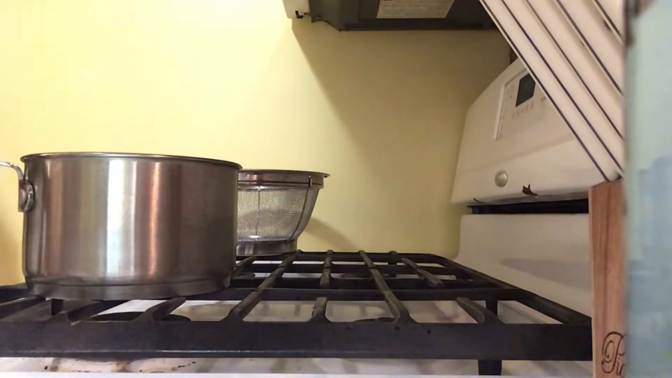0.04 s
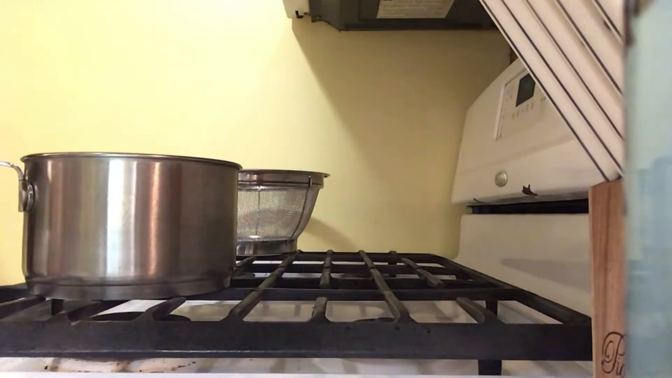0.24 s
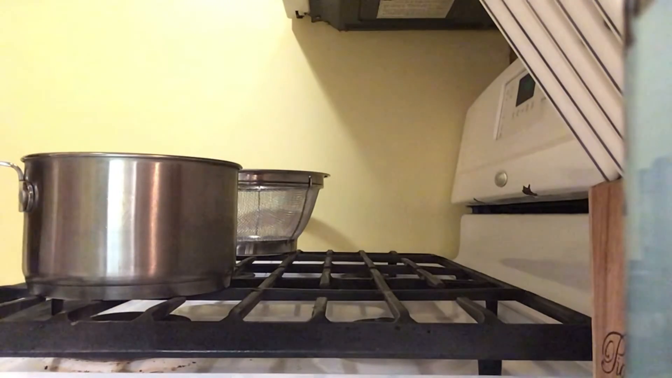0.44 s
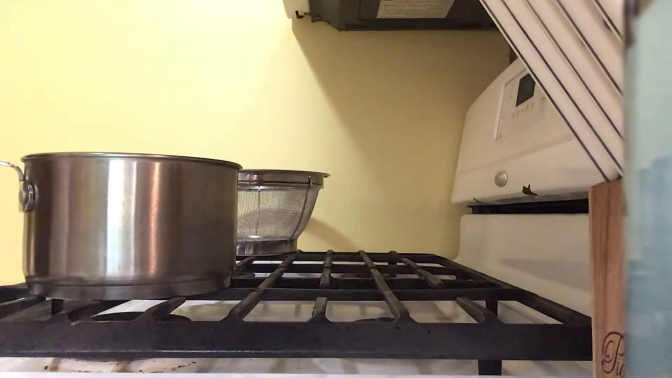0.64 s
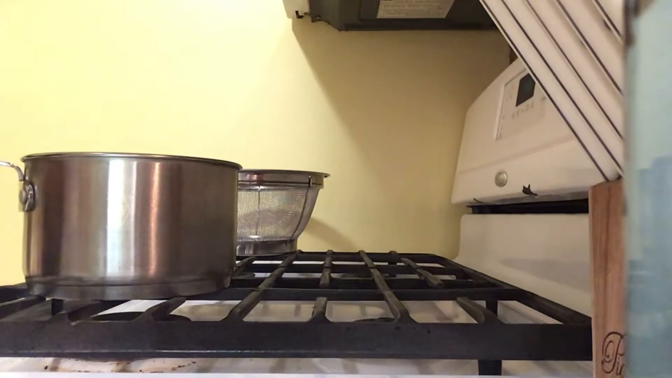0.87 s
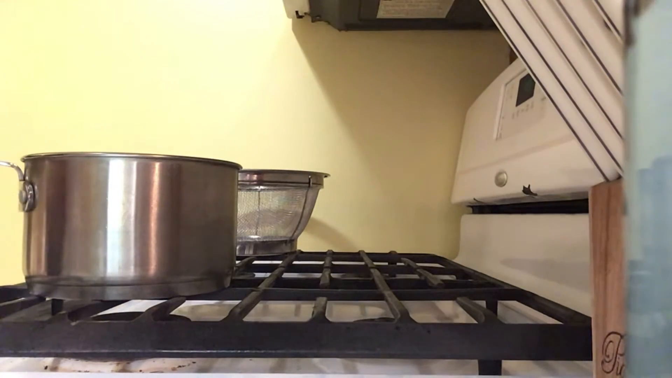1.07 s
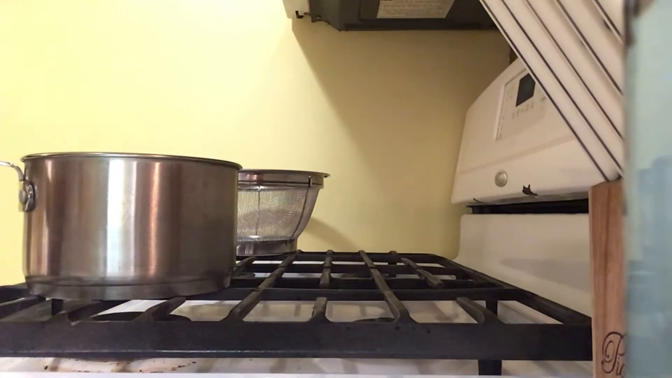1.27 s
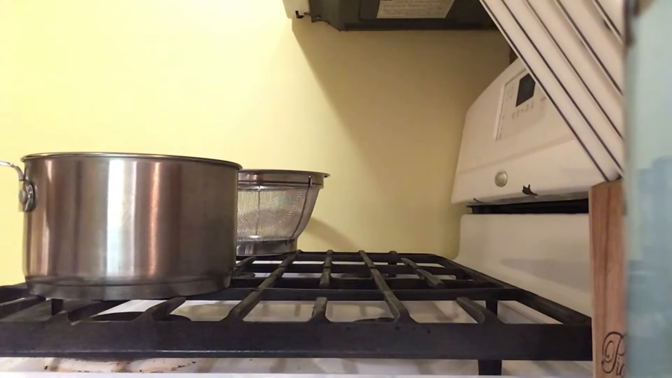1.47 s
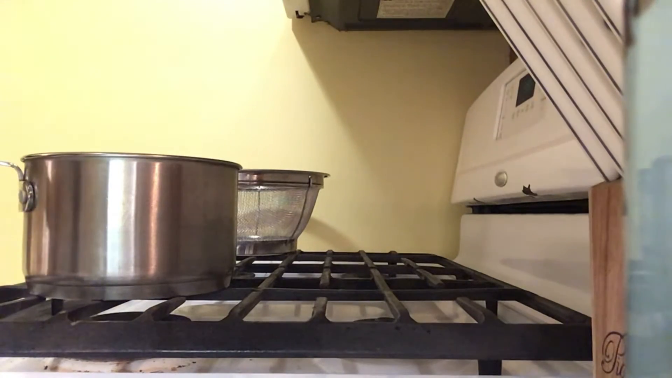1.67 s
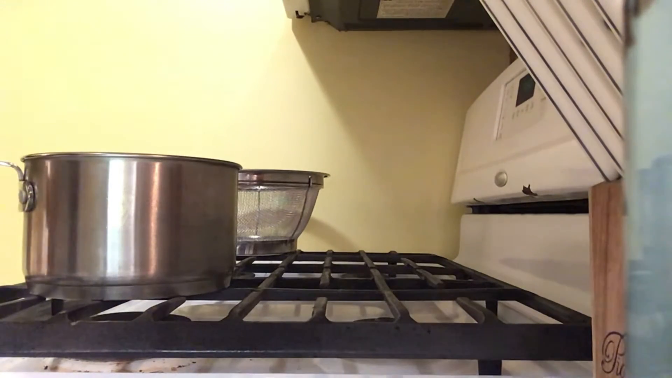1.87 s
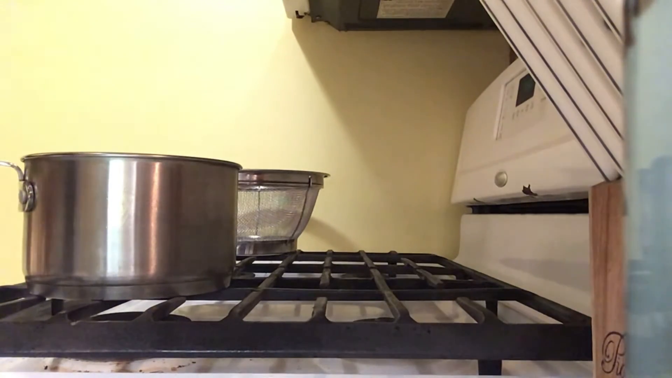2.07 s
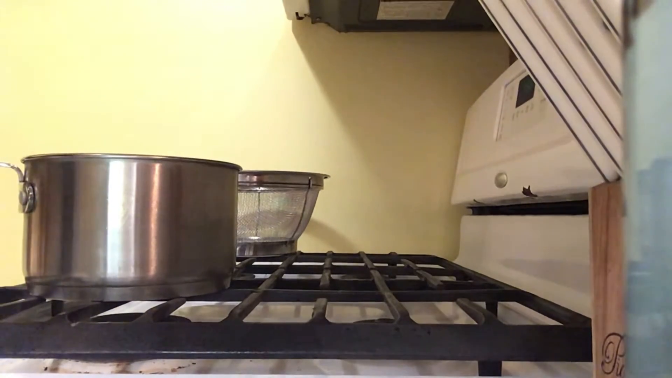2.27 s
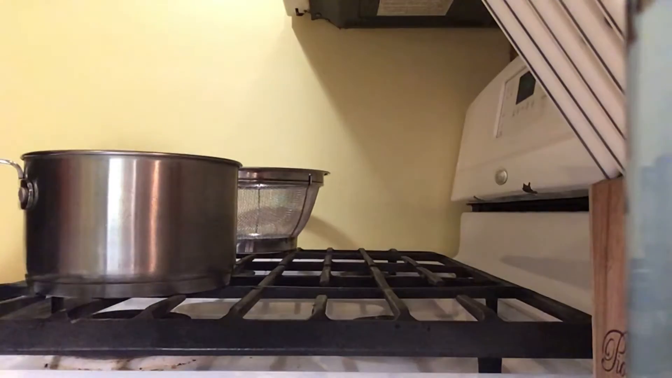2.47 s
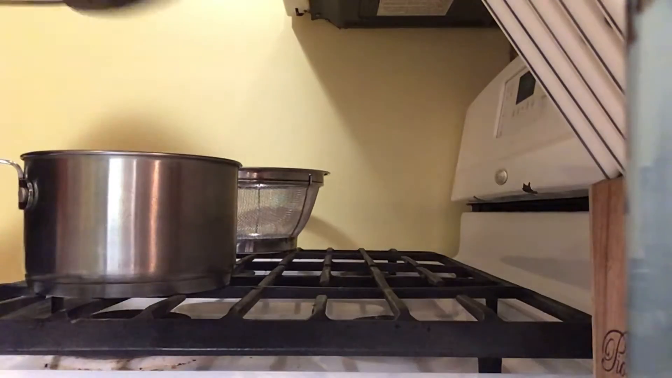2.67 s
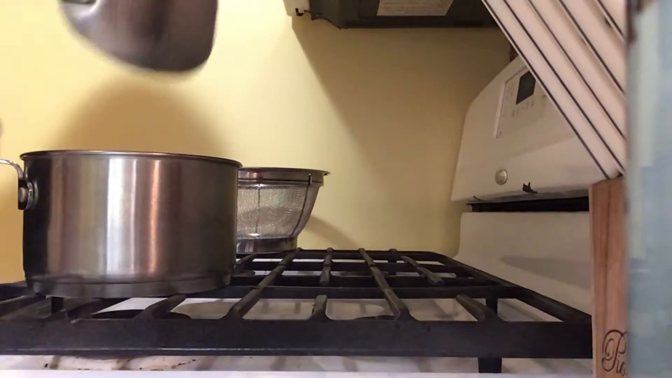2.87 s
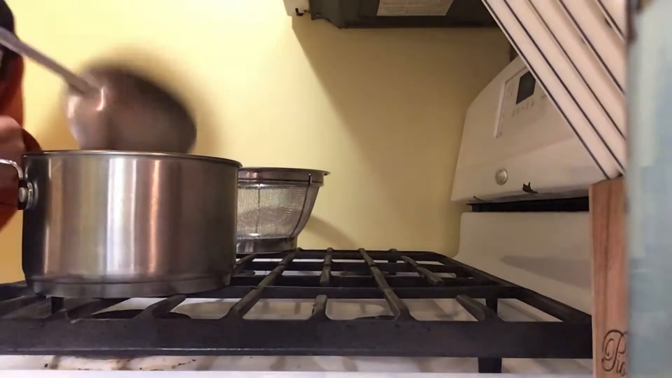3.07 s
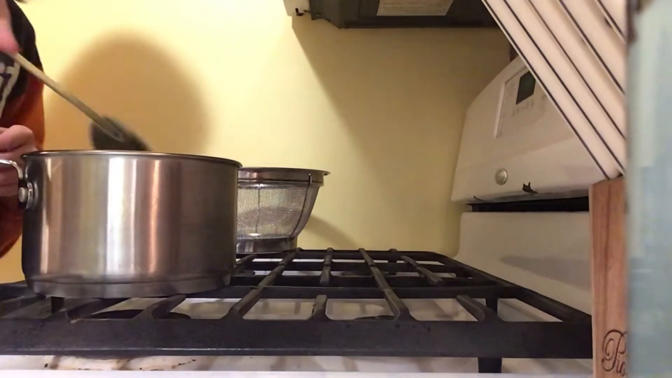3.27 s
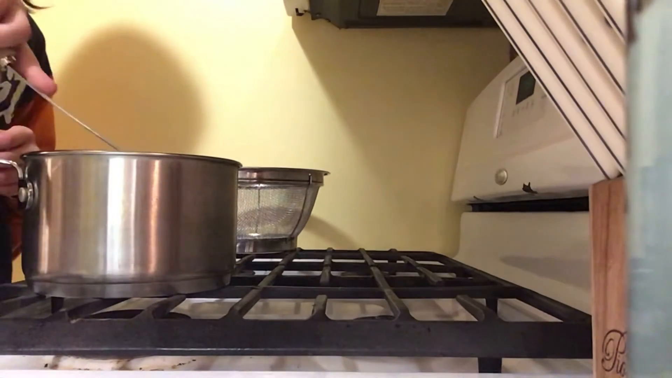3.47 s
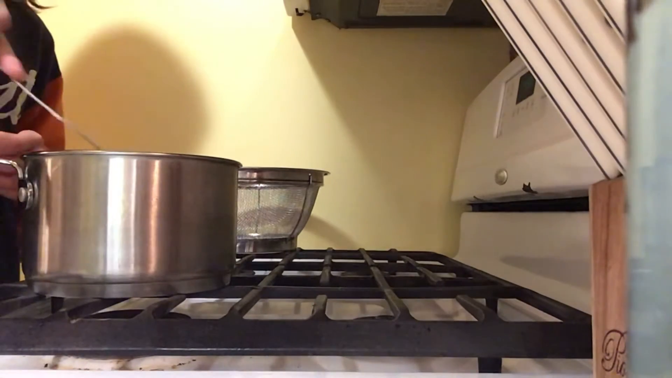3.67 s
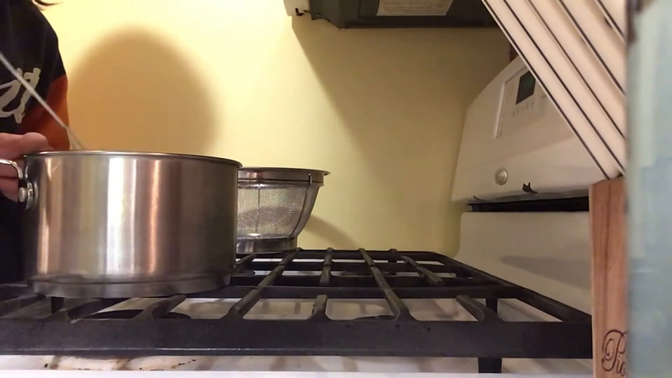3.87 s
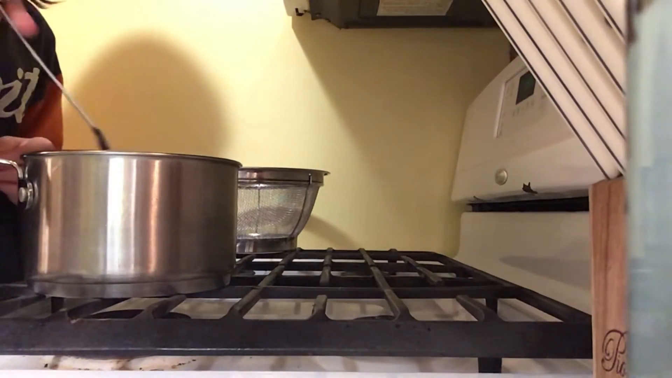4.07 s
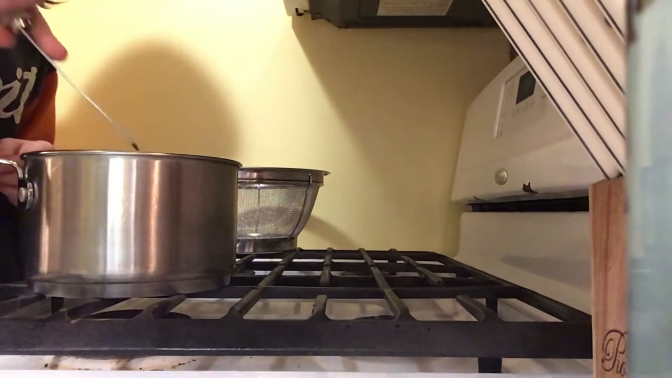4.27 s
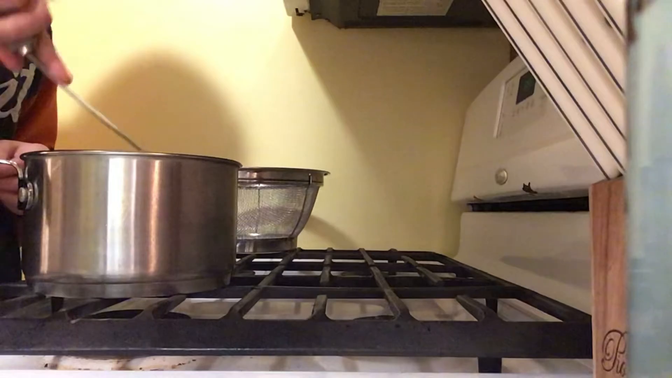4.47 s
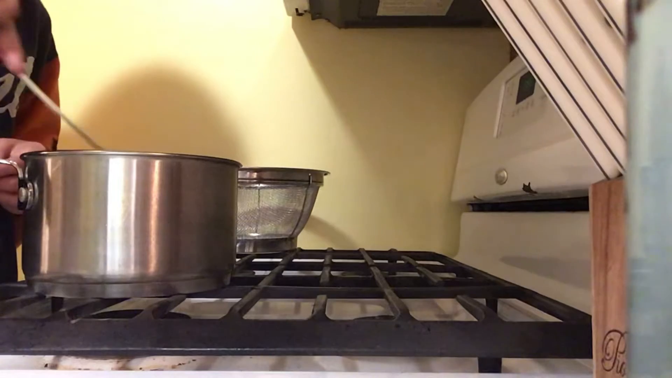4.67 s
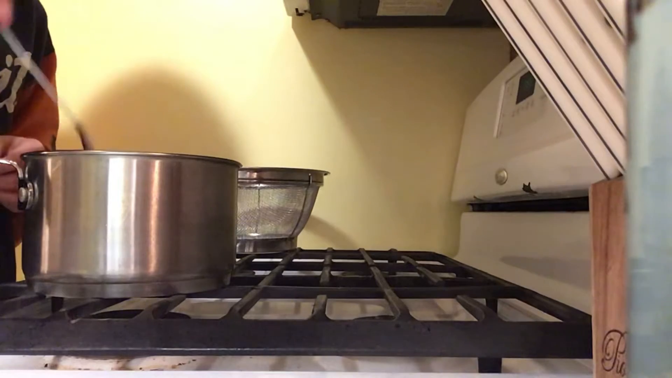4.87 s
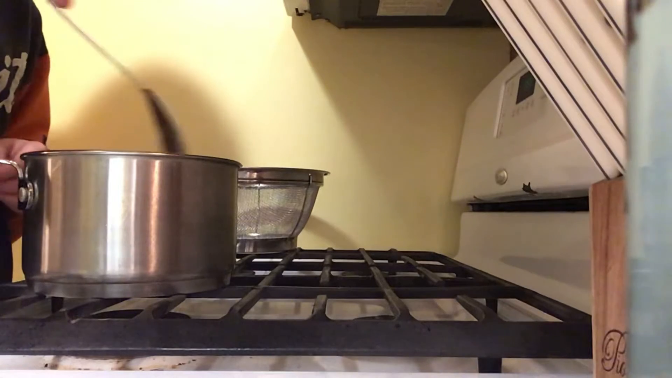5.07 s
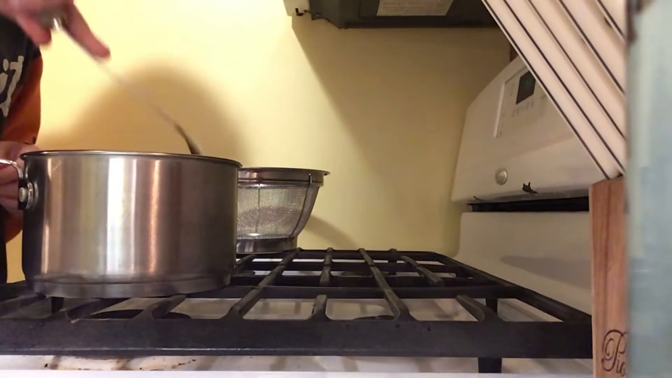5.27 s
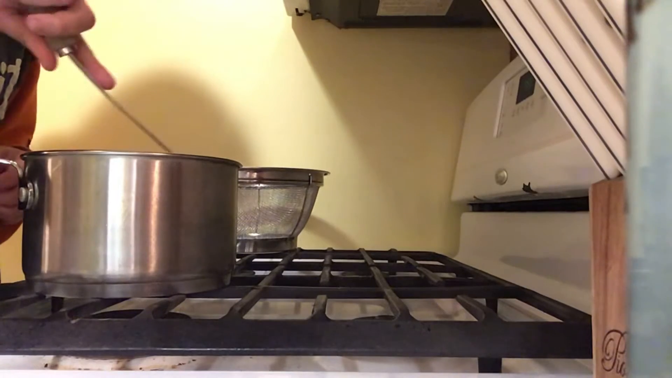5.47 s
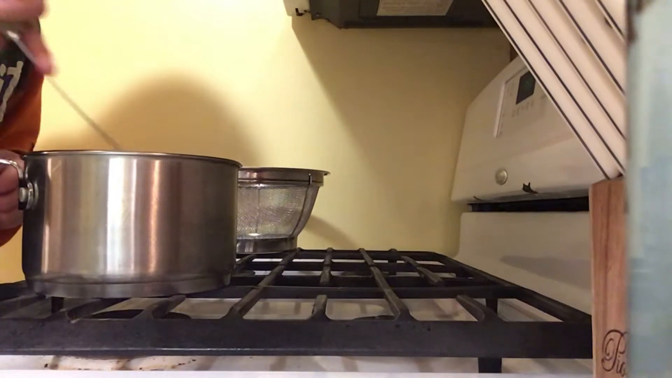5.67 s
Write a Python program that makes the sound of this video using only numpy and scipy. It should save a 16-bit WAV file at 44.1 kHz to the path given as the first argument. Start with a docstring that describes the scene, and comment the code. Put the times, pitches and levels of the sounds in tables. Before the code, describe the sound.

In a small, quiet kitchen with a low hum, cloth rustles faintly, then steel utensils clash in a quick bright jangle as a spoon is pulled out. After a near-silent pause with tiny rings, the spoon knocks a large pot, food crackles softly, and clanks and short scrapes follow. Close microphone, short hard-room echo.

```python
"""Small kitchen, low rumble and hum: a steel serving spoon is fetched, then stirs food in a pot on a stove.
Cloth rustles as noise grains; utensils clash, taps ring the bowl, and the spoon knocks the food-damped pot:
each contact is a noise burst plus ringing modes. Low thuds of counter, stove and grate are resonant noise.
Scraping runs random slips through gliding resonances, over grit and hiss; food crackles in tiny grains.
The kitchen answers every contact with near echoes and a diffuse tail."""
import sys
import numpy as np
from scipy import signal
from scipy.fft import rfft, irfft, next_fast_len
from scipy.io import wavfile
from scipy.ndimage import map_coordinates

SR = 44100
rng = np.random.default_rng(int(sys.argv[2]) if len(sys.argv) > 2 else 0)


def transcribe(signal):
    """Save signal, clipped to [-1, 1], as a 16-bit WAV file at the path in sys.argv[1]."""
    frames = np.atleast_2d(signal).T
    limited = np.clip(frames, -1, 1)
    pcm = np.round(limited * 32767).astype(np.int16)
    wavfile.write(sys.argv[1], SR, pcm)


N = 253027

# room reverberation: freq_hz, t60_s
KITCHEN_DECAY = [(120, 0.74), (400, 0.47), (1500, 0.46), (4000, 0.34), (8000, 0.35), (15000, .27)]
# room rumble spectrum: freq_hz, density_db_per_hz
RUMBLE_SPECTRUM = [(25, -61), (40, -18), (50, -14.5), (65, -1.5), (90, -6), (120, -3.5), (150, -7.5),
                   (270, -8), (400, -15), (750, -26), (1500, -31.5), (4000, -33), (13000, -41),
                   (16000, -55)]
# arm movements: peak_s, relative_level_db, half_length_s
ARM_MOVES = [(0.27, -78, 0.041), (0.61, -65, 0.13), (1.35, -68.5, 0.52), (2.14, -65.5, 0.061),
             (2.75, -78.5, 0.22), (3.42, -72, 0.19)]
# cloth spectrum: freq_hz, density_db_per_hz
CLOTH_SPECTRUM = [(500, -27.5), (1000, -6.5), (1600, 1), (4000, -7), (9000, -8.5), (14000, -7),
                  (16000, -14.5)]
# utensils clashing; hardness is treble over midrange, spot is the favoured pitch; levels are relative:
# start_s, strength_db, hardness_db, spot_hz, ring_db, rebound_db
CLASHES = [(0.86, -29, -3.5, 3560, -9.5, -17.5), (0.996, -40, -10.5, 5915, 4, -13),
           (1.165, -46, -11, 3900, 5, -5.5), (1.186, -42, -3.5, 7890, -8, -12),
           (1.191, -22.5, 6.5, 12840, 1.5, -0.5), (1.211, -33, 9.5, 11600, 8, -12.5),
           (1.234, -30.5, -13, 3580, -14, -9.5), (1.283, -27.5, -14, 3710, -4.5, -14),
           (1.305, -40.5, -3.5, 3620, -1.5, -11.5), (1.335, -35, -5.5, 3880, -4, -1),
           (1.344, -21, 2, 2730, -5, 2), (1.387, -30.5, -9, 630, 4.5, -9), (1.402, -23.5, -3, 2960, -2, 7),
           (1.416, -24, -22, 2780, -0.5, -10.5), (1.429, -28, 9, 2100, 5, -5),
           (1.448, -29.5, -3, 2140, -6.5, -11.5), (1.466, -23.5, -4.5, 2310, -8, -3.5),
           (1.483, -29, -5.5, 2250, -15.5, -11.5)]
# utensil modes: freq_hz, level_db, t60_s
UTENSIL_MODES = [(550, -7, 0.13), (582.7, -3, 0.16), (991, -16, 0.32), (1270, -12, 0.38), (2100, 4, 0.2),
                 (2177, 1, .16), (2322, 0.5, 0.092), (2776, -5.5, 0.43), (2670, -1.5, .2), (2855, -4, 0.18),
                 (3717, 1.5, 0.23), (3520, -13.5, 0.2), (4360, -4.5, 0.23), (4860, -2.5, 0.19),
                 (5625, -4.5, 0.35), (5630, -4.5, .22), (6900, -4, 0.32), (8100, 5, .18), (8800, -6, 0.25),
                 (10700, -6.5, 0.17), (10960, -6, 0.14), (11700, -0.5, 0.093), (12200, -5, 0.1),
                 (13800, -7.5, .13)]
# utensils' dense, short-lived modes: freq_hz, density_db_per_hz
UTENSIL_SPECTRUM = [(100, -18), (330, -14), (450, -7.5), (570, -3.5), (700, -19.5), (1600, -3.5),
                    (2200, -0.5), (2900, 7), (3300, -0.5), (3750, 8.5), (4600, -2.5), (7500, 4), (12500, 0),
                    (16000, -1.5)]
# low thuds of counter, stove and grate: start_s, relative_level_db, strongest_resonance_hz
LOW_THUDS = [(1.194, -50, 70.5), (2.04, -61, 410), (4.027, -39, 196), (4.512, -43, 196),
             (4.949, -36.5, 321), (5.105, -38.5, 502), (5.332, -53, 496), (5.406, -44, 193),
             (5.460, -34.5, 157.3), (5.5, -43.5, 140), (5.551, -47, 66)]
# thud spectrum: freq_hz, density_db_per_hz
THUD_SPECTRUM = [(35, -51), (65, -7), (90, -12.5), (160, 0), (200, -6), (250, -19), (330, -6), (500, -7.5),
                 (900, -41.5), (3000, -83.5)]
# light taps on the lifted spoon: start_s, strength_db, hardness_db, spot_hz, ring_db, rebound_db
SPOON_TAPS = [(2.107, -53, -0.5, 4160, -11.5, -12), (2.511, -45, 12, 4215, -3.5, -13),
              (2.715, -64, 6.5, 6600, -7, -0.5), (2.812, -68, -4.5, 4215, -11, -14)]
# spoon bowl modes: freq_hz, level_db, t60_s
BOWL_MODES = [(4280, 0.5, 0.28), (5260, 1, 0.2), (5960, -9, 0.15), (6930, 7, 0.11), (7710, 0, 0.087),
              (8750, -3, 0.12), (11540, -6, 0.16), (12500, 0, 0.2), (12830, -1, 0.14), (14050, 1.5, 0.23)]
# bowl's dense, short-lived modes: freq_hz, density_db_per_hz
BOWL_SPECTRUM = [(300, -33.5), (2000, -8), (4000, 9.5), (5000, -13.5), (7000, 1.5), (13000, -0.5),
                 (16000, -4.5)]
# spoon dragged through the pot; hiss and singing are relative to grinding:
# start_s, length_s, grind_db, hiss_db, sing_db, start_shift_hz
DRAG_STROKES = [(3.311, 0.12, -59, -26, -12, 0), (4.433, 0.175, -45, -7.5, 8, 90.5),
                (4.574, 0.11, -40.5, -7.5, 3, 71), (5.163, 0.1, -53.5, 1.5, -19, 60),
                (5.403, 0.15, -42.5, -17, -3.5, -3), (5.524, 0.22, -38.5, -1.5, 2.5, 162)]
# resonances of the spoon pressed on steel: freq_hz, width_hz, level_db
PRESSED_MODES = [(1260, 28, 7.5), (1614, 46, -3), (1770, 33, 3.5), (2500, 47, -6.5), (3030, 30, -19),
                 (3560, 21, -0.5), (4500, 48, -8), (5670, 50, -10), (6420, 50, -5)]
# grinding spectrum: freq_hz, density_db_per_hz
GRIT_SPECTRUM = [(100, -26.5), (300, 4), (700, 14), (1700, 16.5), (3500, 14), (5000, 6), (8000, -42.5)]
# hiss and food crackle spectrum: freq_hz, density_db_per_hz
HISS_SPECTRUM = [(2500, -28.5), (5500, 0.5), (9000, -0.5), (13000, -4), (16000, -10.5)]
# spoon against the pot: start_s, strength_db, hardness_db, spot_hz, ring_db, rebound_db
POT_KNOCKS = [(3.448, -26, -6.5, 3350, -5, -13), (4.024, -26.5, -1.5, 526, 1.5, 0.5),
              (4.337, -37.5, -18, 3280, 1, -0.5), (4.502, -29, 2.5, 4220, 6, 0),
              (4.943, -31.5, 0.5, 4460, -0.5, 1.5), (5.099, -39, -4, 2880, 6.5, -7.5),
              (5.329, -60, 6.5, 3294, 12.5, 5), (5.395, -42.5, -1, 740, 9, -3),
              (5.454, -36, -8, 2886, 1, 0)]
# pot modes: freq_hz, level_db, t60_s
POT_MODES = [(170.2, -11.5, 0.46), (201, -6.5, 0.19), (323, 1.5, 0.2), (365.4, -5.5, 0.48),
             (498, -4.5, 0.33), (558, -5, 0.15), (694, 13.5, 0.029), (921.5, 2, 0.35), (1314, -7, 0.24),
             (1423, -1.5, 0.28), (1537, -5, 0.25), (1814, -4, 0.32), (2453, 3, 0.09), (2930, 0, 0.1),
             (3340, -4.5, 0.18), (3900, -13.5, .2), (3810, -35.5, 0.18), (4475, -12.5, 0.05),
             (5600, -9.5, 0.11), (6310, 2, 0.11)]
# pot's dense, short-lived modes: freq_hz, density_db_per_hz
POT_SPECTRUM = [(60, -47), (130, -17), (190, 1), (330, -0.5), (430, -3.5), (700, 2), (850, -8), (1400, -6),
                (2100, -11), (3400, -7.5), (5000, -16.5), (8000, -15), (12500, -18), (16000, -29.5)]
# food shifting around the spoon: peak_s, relative_level_db, half_length_s
FOOD_SHIFTS = [(3.54, -69.5, 0.2), (3.797, -68.5, 0.015), (4.25, -75, 0.47), (5.3, -73, 0.42)]

MIC_TOP_HZ = 15950
MAINS_HUM_HZ, RUMBLE_DB = 120, -61.5
PRESS_S, LIFT_T60_S = 0.021, 0.079  # a stroke takes hold; force decays once the spoon lifts
EASE_DB_PER_S, DULL_DB_PER_S = 37, 34.5  # pressure easing along a stroke; extra fading of the hiss
SING_DB, SETTLE_S = -3, 0.13  # pressed steel level; time to reach full singing
SINK_HZ_PER_S = 1200  # resonances sink as the contact point slides


def amp(db):
    """Decibels to gain."""
    return 10 ** (np.asarray(db) / 20)


def unit(x):
    """Scale to rms 1."""
    return x / np.sqrt(np.mean(x ** 2) + 1e-20)


def pulse(x):
    """Scale to energy 1."""
    return x / (np.linalg.norm(x) + 1e-12)


def along(points, hz):
    """Read (Hz, value) points on a log-frequency axis."""
    point_hz, value = np.transpose(points)
    return np.interp(np.log(hz + 1), np.log(point_hz), value)


def fade(t_s, t60_s):
    """Exponential decay, 60 dB per t60."""
    return np.exp(-np.log(1000) * t_s / np.maximum(t60_s, 1e-3))


def add(track, start_s, sound):
    """Mix a sound into the track."""
    part = track[round(start_s * SR):][:len(sound)]
    part += sound[:len(part)]


def filtered(x, response):
    """Multiply the spectrum by a response of frequency."""
    size = next_fast_len(len(x) + SR // 8)
    spectrum = rfft(x, size) * response(np.fft.rfftfreq(size, 1 / SR))
    return irfft(spectrum, size)[:len(x)]


def coloured(x, spectrum):
    """Causal (minimum-phase) filter with the given (Hz, dB) shape."""
    size = 4096
    log_gain = np.log(amp(along(spectrum, np.fft.rfftfreq(size, 1 / SR))))
    cepstrum = irfft(log_gain)
    # fold the cepstrum so the response is causal
    cepstrum[1:size // 2] *= 2
    cepstrum[size // 2 + 1:] = 0
    impulse = irfft(np.exp(rfft(cepstrum)))
    return signal.fftconvolve(x, impulse)[:len(x)]


def resonance(f, hz, width_hz):
    """Response of one damped mode, 1 at its centre."""
    return 1j * f * width_hz / (hz * hz - f * f + 1j * f * width_hz)


def grains(per_second, spread_db):
    """Random tiny impulses of uneven size."""
    hits = rng.random(N) < per_second / SR
    return hits * rng.standard_normal(N) * amp(spread_db * rng.standard_normal(N))


def wobble(knots_per_s):
    """Random curve, linear between knots."""
    knots = rng.standard_normal(SR // 16)
    return map_coordinates(knots, [np.arange(N) * knots_per_s / SR], order=1, mode="wrap")


def swells(rows):
    """Gain per sample: each movement swells and dies as a bell curve."""
    t_s = np.arange(N) / SR
    return sum(amp(db) * np.exp(-((t_s - peak_s) / half_s) ** 2) for peak_s, db, half_s in rows)


def drifting(x, glide, waver):
    """Raise pitch by the share glide, with a random waver."""
    return map_coordinates(x, [np.cumsum(1 + glide + waver * wobble(20))], order=3, mode="wrap")


def kitchen(x, wet_db, near_db=-9, near_t60_s=0.041):
    """Direct sound, quick echoes off the stove, and a diffuse tail with frequency-dependent decay."""
    hz, t_s, cells = signal.stft(rng.standard_normal(SR // 2), SR, nperseg=256)
    decay = fade(t_s, along(KITCHEN_DECAY, hz)[:, None])
    tail = signal.istft(cells * decay, SR, nperseg=256)[1]
    near = rng.standard_normal(len(tail)) * fade(np.arange(len(tail)) / SR, near_t60_s)
    answer = amp(wet_db) * pulse(tail) + amp(near_db) * pulse(near)
    answer = np.pad(answer, (SR // 300, 0))  # nearest surface half a metre away
    return x + signal.fftconvolve(x, answer)[:len(x)]


def contacts(events, knock_db, chatter_t60_s, lag_s, softer_db, deeper_db, rebound_t60_s):
    """Strike and rebound per event; the rebound's treble and bass are offset from its midrange."""
    rows = []
    for start_s, db, hard_db, spot_hz, ring_db, rebound_db in events:
        again_db = db + rebound_db
        rows.append((start_s, db + knock_db, db, db + hard_db, chatter_t60_s, spot_hz, ring_db))
        again_low_db = again_db + knock_db + deeper_db
        again_high_db = again_db + hard_db - softer_db
        rows.append((start_s + lag_s, again_low_db, again_db, again_high_db,
                     rebound_t60_s, spot_hz, ring_db))
    return rows


def strikes(events, modes, body, ring_db, spot_db, detune, wet_db,
            low_db, mid_db, high_db, spot_width, favour_db):
    """Each contact chatters briefly and rings the modes; three registers set its hardness."""
    track, t_s = np.zeros(N), np.arange(SR // 2) / SR
    hz, mode_db, t60_s = np.transpose(modes)[:, :, None]
    bands = [(1200, "low"), ([1200, 5000], "band"), (5000, "high")]
    registers = [signal.butter(3, edge_hz, kind, fs=SR, output="sos") for edge_hz, kind in bands]
    onset = 1 - np.exp(-t_s / .0004)
    for start_s, knock_db, clang_db, sparkle_db, chatter_t60_s, spot_hz, own_ring_db in events:
        width_hz = spot_width * spot_hz
        burst = rng.standard_normal(len(t_s)) * onset * fade(t_s, chatter_t60_s)
        crack = pulse(coloured(burst, body))
        # struck spot favours nearby modes
        sizes = amp(mode_db + 2.5 * rng.standard_normal(hz.shape))
        sizes = sizes * (1 + amp(favour_db) * np.abs(resonance(hz, spot_hz, width_hz)) ** 2)
        # uneven shape splits each mode into a beating pair
        beats = np.cos(2 * np.pi * detune * hz * rng.standard_normal(hz.shape) * t_s)
        # grip and load shift modes from blow to blow
        pitch_hz = hz * (1 + .004 * rng.standard_normal(hz.shape))
        tones = np.sin(2 * np.pi * (pitch_hz * t_s + rng.random(hz.shape)))
        ring = pulse(onset * np.sum(sizes * beats * fade(t_s, t60_s) * tones, axis=0))
        blow = crack + amp(ring_db + own_ring_db) * ring
        # spot colours the whole blow
        blow = filtered(blow, lambda f: 1 + amp(spot_db) * resonance(f, spot_hz, width_hz))
        levels_db = knock_db + low_db, clang_db + mid_db, sparkle_db + high_db
        blow = sum(amp(db) * pulse(signal.sosfilt(sos, blow)) for db, sos in zip(levels_db, registers))
        add(track, start_s, kitchen(blow, wet_db))
    return track


def room_tone(hum_db):
    """Low rumble as shaped noise; appliance mains hum as a sine."""
    hum = amp(hum_db) * unit(np.sin(2 * np.pi * MAINS_HUM_HZ * np.arange(N) / SR))
    rumble = amp(RUMBLE_DB) * unit(coloured(rng.standard_normal(N), RUMBLE_SPECTRUM))
    return hum + rumble


def sleeve():
    """Moving cloth rustles in dense, uneven grains."""
    return swells(ARM_MOVES) * unit(coloured(grains(per_second=9000, spread_db=6.5), CLOTH_SPECTRUM))


def clatter():
    """Utensils clash and rebound as the spoon is pulled from among them."""
    blows = contacts(CLASHES, knock_db=-17.5, chatter_t60_s=0.035, lag_s=0.005,
                     softer_db=1, deeper_db=-1.5, rebound_t60_s=0.035)
    return strikes(blows, UTENSIL_MODES, UTENSIL_SPECTRUM, ring_db=-4.5, spot_db=8.5, detune=.004,
                   wet_db=-8.0, low_db=30, mid_db=22.0, high_db=23.0, spot_width=0.05, favour_db=4)


def thuds(thud_db, t60_s, wet_db, boom_db=9, boom_width=0.093):
    """Low thuds of counter, stove and grate: short noise with one boosted resonance."""
    track, t_s = np.zeros(N), np.arange(SR // 2) / SR
    for start_s, db, boom_hz in LOW_THUDS:
        thud = coloured(rng.standard_normal(len(t_s)) * fade(t_s, t60_s), THUD_SPECTRUM)
        thud = filtered(thud, lambda f: 1 + amp(boom_db) * resonance(f, boom_hz, boom_width * boom_hz))
        add(track, start_s, amp(db + thud_db) * pulse(kitchen(thud, wet_db)))
    return track


def taps():
    """Light touches ring the lifted spoon's bowl."""
    blows = contacts(SPOON_TAPS, knock_db=-33, chatter_t60_s=0.045, lag_s=0.006,
                     softer_db=-1, deeper_db=0, rebound_t60_s=0.05)
    return strikes(blows, BOWL_MODES, BOWL_SPECTRUM, ring_db=-2.5, spot_db=-3.5, detune=0.00073,
                   wet_db=-9, low_db=15, mid_db=21.5, high_db=24.5, spot_width=0.018, favour_db=-0.5)


def strokes():
    """Grind, hiss and sing gains and pitch shift: strokes press, ease and lift while pitch sinks."""
    t_s = np.arange(N) / SR
    grind, hiss, sing, shift_hz = np.zeros((4, N))
    for start_s, length_s, db, hiss_db, sing_db, start_hz in DRAG_STROKES:
        age_s = np.maximum(t_s - start_s, 0)
        press = np.minimum(age_s / PRESS_S, 1)
        lift = fade(np.maximum(age_s - length_s, 0), LIFT_T60_S)
        force = press * amp(db - EASE_DB_PER_S * age_s) * lift
        grind += force
        hiss += force * amp(hiss_db - DULL_DB_PER_S * age_s)
        sing += force * amp(sing_db) * np.minimum(age_s / SETTLE_S, 1)
        sunk_hz = start_hz - SINK_HZ_PER_S * np.minimum(age_s, length_s)
        shift_hz = np.where(t_s > start_s, sunk_hz, shift_hz)
    return grind, hiss, sing, shift_hz


def scraping(sing_db, grit_db, hiss_db, catch_knots_per_s, wall_t60_s=0.028, wall_hz=3000):
    """Uneven slips of steel on steel excite resonances that drift with the contact point."""
    grind, hiss, singing, shift_hz = strokes()
    # edge catches and frees itself
    slips = grains(per_second=5000, spread_db=2.5) * amp(2 * wobble(catch_knots_per_s))
    sing = np.zeros(N)
    for hz, width_hz, db in PRESSED_MODES:
        tone = unit(filtered(slips, lambda f: resonance(f, hz, width_hz)))
        sing += amp(db + 1.9 * wobble(18)) * drifting(tone, shift_hz / hz, waver=0.008)
    # wall's dense, short-lived modes streak grit and hiss
    t_s = np.arange(SR // 16) / SR
    wall_response = rng.standard_normal(len(t_s)) * fade(t_s, wall_t60_s)
    wall = signal.fftconvolve(slips, wall_response)[:N]
    wall = drifting(wall, shift_hz / wall_hz, waver=0.004)
    steel = amp(sing_db) * singing * unit(sing)
    steel += amp(grit_db) * grind * unit(coloured(wall, GRIT_SPECTRUM))
    steel += amp(hiss_db) * hiss * unit(coloured(wall, HISS_SPECTRUM))
    return kitchen(steel, wet_db=-8.5)


def food():
    """Wet food parts around the spoon with a fine crackle of grains."""
    crackle = unit(coloured(grains(per_second=600, spread_db=2), HISS_SPECTRUM))
    return kitchen(swells(FOOD_SHIFTS) * crackle, wet_db=-2.5)


def knocks():
    """Spoon edge clicks on the pot, then its flat lands with a longer, lower knock."""
    blows = contacts(POT_KNOCKS, knock_db=-0.5, chatter_t60_s=0.036, lag_s=0.004,
                     softer_db=3, deeper_db=5.5, rebound_t60_s=0.087)
    return strikes(blows, POT_MODES, POT_SPECTRUM, ring_db=-8.5, spot_db=2, detune=0.0031,
                   wet_db=-8.0, low_db=23.5, mid_db=26.5, high_db=26.0, spot_width=0.086, favour_db=3.5)


def scene():
    """The spoon is fetched, then stirs."""
    fetching = room_tone(hum_db=-65.0) + sleeve() + clatter() + taps()
    low_thuds = thuds(thud_db=34.0, t60_s=0.022, wet_db=2.5)
    scrape = scraping(sing_db=SING_DB, grit_db=-3, hiss_db=-1.5, catch_knots_per_s=50)
    return (fetching + low_thuds + scrape + food() + knocks())[None]


def record(dry):
    """Microphone band limit: a 400 Hz wide slope to silence, centred on MIC_TOP_HZ."""
    return filtered(dry[0], lambda hz: np.clip((MIC_TOP_HZ - hz) / 400 + .5, 0, 1))[None]


dry = scene()
out = record(dry)
transcribe(out)
```